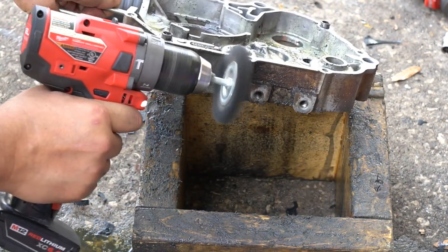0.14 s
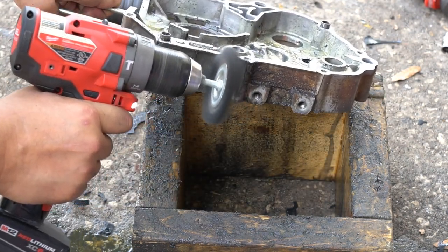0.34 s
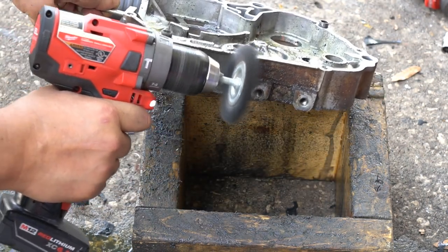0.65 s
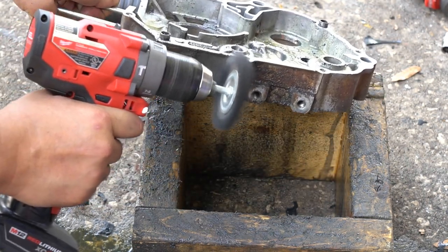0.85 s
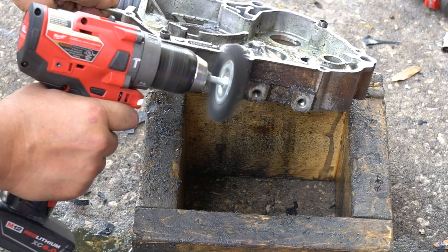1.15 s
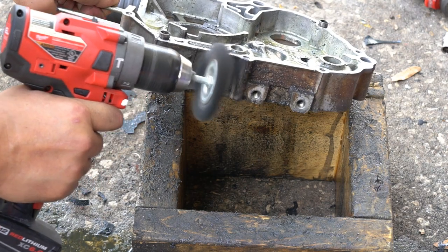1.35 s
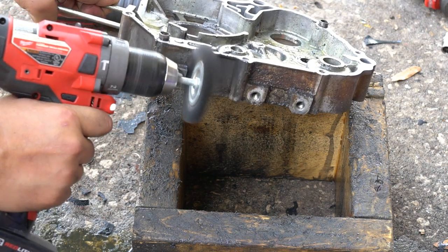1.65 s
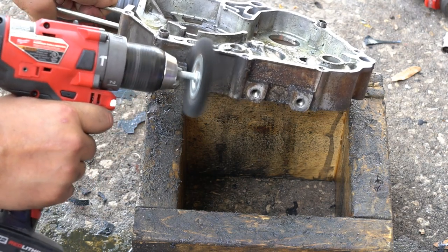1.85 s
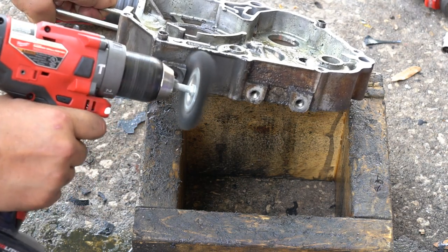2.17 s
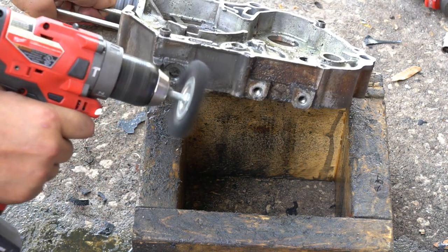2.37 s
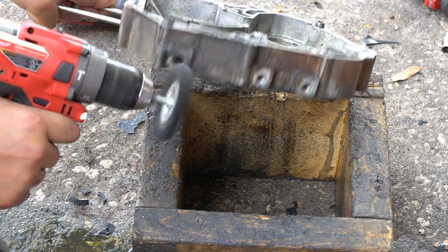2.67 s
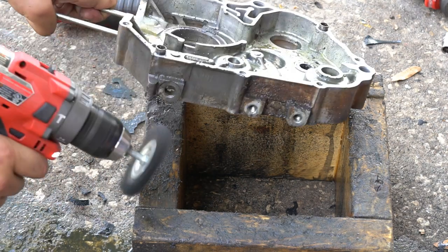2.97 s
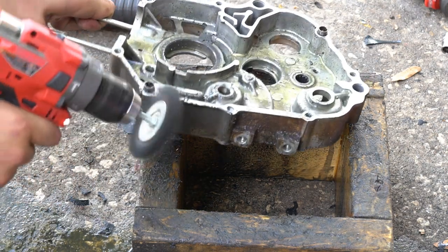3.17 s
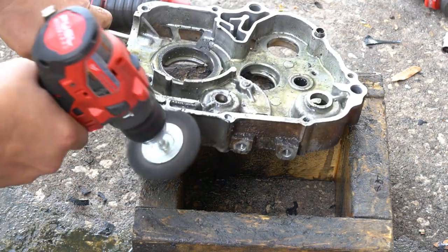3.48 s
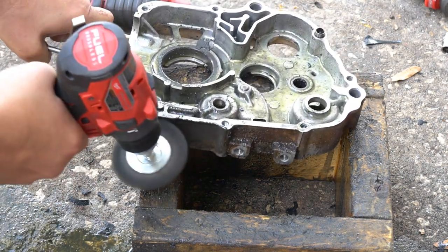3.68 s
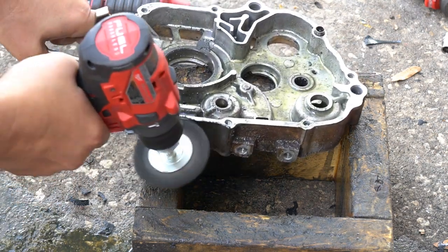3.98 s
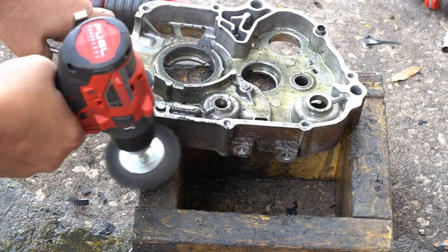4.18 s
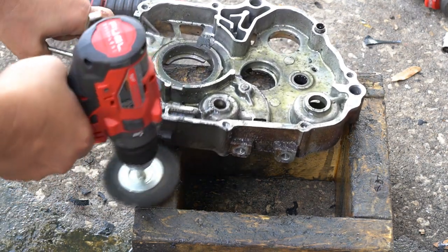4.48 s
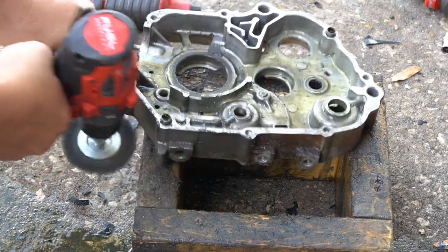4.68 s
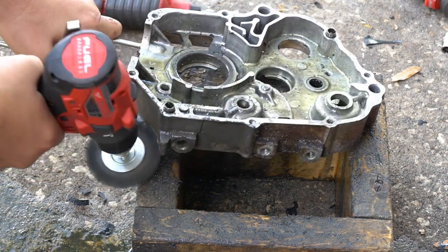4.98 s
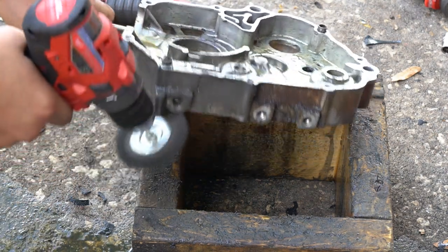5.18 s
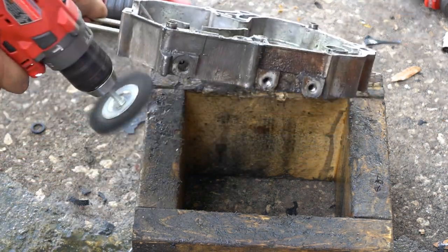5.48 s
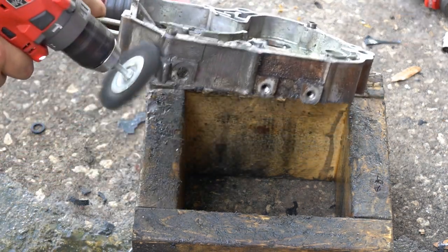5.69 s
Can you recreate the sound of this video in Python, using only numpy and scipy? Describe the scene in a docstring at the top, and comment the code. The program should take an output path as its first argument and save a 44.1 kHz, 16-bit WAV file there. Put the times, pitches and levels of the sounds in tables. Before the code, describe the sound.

A cordless drill whines loudly at high pitch while its spinning wire wheel hisses and scrapes over a cast metal case, with one hard metallic knock.

```python
"""A cordless drill spins a wire wheel against a cast metal case over a wooden box, outdoors and close by.
The motor sings on multiples of its rotor speed, over gear lines, a roar, wire hiss and a ringing case.
From 2.3 s the whine swings in level and side; from 3.4 s the drill points down and the roar turns hollow.
Soft box thumps come from 3.85 s on. At 4.63 s a hard knock rings the casting's modes, a limiter ducks and
the drill lines drop for 60 ms; lesser knocks and one gust near 5.2 s follow the hard knock."""
import sys
import numpy as np
from scipy import signal
from scipy.fft import rfft, irfft
from scipy.io import wavfile
from scipy.ndimage import uniform_filter1d, minimum_filter1d

SR = 44100
rng = np.random.default_rng(int(sys.argv[2]) if len(sys.argv) > 2 else 0)


def master(y):
    """Save y as 16-bit WAV."""
    cut = np.clip(np.atleast_2d(y).T, -1, 1)
    pcm = np.round(cut * 32767)  # scale
    wavfile.write(sys.argv[1], SR, pcm.astype(np.int16))


N = 257103

# rotor slowing as the wires bite: (time [s], speed [turns/s])
ROTOR_SPEED = [(0, 462.8), (.72, 462.6), (1.2, 465), (1.77, 464.6), (2.06, 462.3), (2.18, 463.7),
               (2.31, 469.7), (2.52, 468.2), (2.61, 471), (2.68, 464.9), (2.75, 465.5), (2.81, 461.7),
               (2.93, 469.8), (3.12, 472.1), (3.2, 471.5), (3.29, 463.5), (3.43, 466.6), (3.58, 460),
               (3.83, 457.5), (3.97, 462.8), (4.21, 457.8), (4.33, 462.3), (4.44, 459.4), (4.51, 449.3),
               (4.73, 452.5), (4.81, 467), (4.9, 472), (4.94, 470.5), (4.99, 463), (5.08, 464.5),
               (5.17, 471.6), (5.3, 467.4), (5.39, 462.2), (5.45, 465.5), (5.56, 471), (5.66, 468.4),
               (5.77, 470.4), (5.82, 465.7)]
# main whine, multiple 8, as the drill turns in the hand: (time [s], level [dB rms], left-right [dB])
WHINE = [(0, -15, 3), (.33, -14, 1.5), (.69, -15, .6), (2.19, -14, -2), (2.27, -16.5, -10),
         (2.32, -22, -2.2), (2.38, -19, -1.2), (2.63, -22.5, 8), (2.68, -14, -4), (2.75, -22, -6),
         (2.8, -15.5, -3), (2.84, -20, -2.5), (2.88, -29, 0), (2.97, -26, 16.5), (3.1, -14, 0),
         (3.21, -20, 5), (3.27, -15, -3), (3.66, -23.5, -7.5), (3.99, -22, -8.5), (4.17, -23.5, -7.5),
         (4.44, -21.5, -7), (4.52, -27, -6), (4.61, -26, 15), (4.72, -23.5, -5), (4.77, -26.5, 0),
         (4.9, -30, -19), (5.04, -26.5, 0), (5.11, -38, 3), (5.19, -30, -5), (5.22, -23, -5),
         (5.27, -19, -5), (5.39, -21, 8), (5.49, -17, -6), (5.53, -30, -7), (5.61, -20.5, 1.5),
         (5.67, -31, 8), (5.77, -16, 4), (5.82, -30, 7)]
# drop of the drill lines around the hard knock: (time [s], gain [dB])
LINE_DROP = [(4.628, 0), (4.632, -12), (4.68, -12), (4.69, 0)]
# weaker lines as the drill turns in the hand; multiple 26 and gears running free:
# (time [s], multiple 4 [dB], multiple 12 [dB], multiple 13 [dB], multiple 26 [dB], gears [dB])
OVERTONES = [(0, -27, -44, -40, -31, -39), (.7, -27.5, -41, -41.5, -31, -39),
             (2.19, -36.5, -45, -34.5, -41, -43.5), (2.5, -38.5, -40, -36, -39, -37),
             (2.85, -38.5, -48, -31, -40, -47), (3.1, -32.5, -40, -32, -36, -43),
             (3.4, -31, -46, -34.5, -32, -37.5), (3.9, -31, -46, -32.5, -34, -40),
             (4.44, -29.5, -44, -32.5, -31, -39), (4.55, -37, -46, -38, -41, -37.5),
             (4.72, -36, -48, -39, -44, -46), (4.86, -32.5, -46, -35, -41, -41),
             (5.05, -33, -39, -33, -31, -34.5), (5.17, -34.5, -46, -31, -33, -34),
             (5.27, -31, -44, -33, -38, -38), (5.45, -33, -44, -33, -41, -52),
             (5.6, -29, -36, -33, -36, -35), (5.83, -31, -42, -45, -41, -40)]
# phase by which left leads as direct sound and its reflection off the casting mix:
# (time [s], multiple 8 [rad], multiple 4 [rad])
LEFT_LEAD = [(0, 0, .55), (1, 0, .55), (1.2, .15, .55), (2.2, .2, .6), (2.3, 1.5, .1), (2.6, 1.3, .3),
             (2.72, .3, 0), (2.92, 1.9, .2), (3.07, 0, .3), (3.22, .8, .1), (3.5, .5, .3), (3.8, .2, .3),
             (4.45, 0, .25), (4.58, 1.1, .2), (4.72, -.2, -.2), (4.88, -2.2, -.1), (5, .5, -.3),
             (5.2, .7, .1), (5.5, -.1, .15), (5.62, -1.3, .15), (5.75, -.6, .2), (5.83, -1.7, .2)]
# steady motor lines: (multiple of rotor speed [1], level [dB rms])
STEADY_LINES = [(1, -44), (3, -42.5), (16, -49), (17, -49)]
# gearbox lines: (multiple of rotor speed [1], level re gears [dB], extra pointing down [dB])
GEAR_LINES = [(8.333, -1, 0), (8.281, -10, -4), (8.387, -11, -1), (8.23, -13, 0), (8.44, -15, 2),
              (6.367, -8, 0), (7.776, -14, 9), (7.52, -17, 8), (3.082, -14, -4), (11.336, -16, 6),
              (9.336, -16, 0), (10.41, -24, 13), (16.117, -18, 10)]
# drill in the hand: (time [s], pointing down [0-1], vents toward listener [dB], roar [dB])
POSE = [(0, .02, -41, -24.5), (2.2, 0.03, -39.5, -25.5), (2.75, 0.08, -36, -23.5), (2.9, 0.05, -55, -23),
        (3.25, 0.1, -55, -23.5), (3.45, 0.7, -48, -23.5), (4.4, 0.93, -37, -22), (4.72, 0.5, -55, -24.5),
        (4.95, 0.3, -48, -23), (5.83, 0, -48, -22)]
# roar spectrum: (frequency [Hz], relative density [dB/Hz])
ROAR_SPECTRUM = [(100, -44), (200, -44), (300, -30.5), (500, -22), (780, -6), (1100, -8.5), (1600, -8.5),
                 (2200, -4), (3300, -6.5), (4500, -9.5)]
# wire hiss spectrum: (frequency [Hz], relative density [dB/Hz])
HISS_SPECTRUM = [(2500, -10), (3500, -6), (4500, -9.5), (5700, -6), (6900, -10.5), (8500, -8), (11000, -14),
                 (14000, -17), (18000, -12.5)]
# left-right correlation of the noises: (frequency [Hz], likeness [1])
LIKENESS = [(100, .85), (300, .98), (600, 1), (1400, 0.92), (3000, 0.56), (6000, 0.3), (12000, 0.45)]
# balance of the noises: (frequency [Hz], left-right [dB])
NOISE_SIDE = [(60, 0.0), (180, -1), (550, 1), (1650, -1.5), (4970, 2), (15000, 0.5)]
# wheel catching an edge: (time [s], half-length [s], hiss gain [dB], ring gain [dB])
CATCHES = [(.64, 0.28, 1.5, 1.5), (2.0, 0.27, -0.3, 2), (2.472, 0.18, 3, 11), (2.65, .08, 2.5, 8),
           (2.765, 0.1, 0, 14), (3.22, 0.058, 3, 7), (4.2, 0.16, 0.5, 9), (4.444, 0.075, 4.5, .6),
           (4.96, .06, 5.5, 3), (5.23, 0.15, 2, 12.5), (5.357, 0.24, 4.5, 2), (5.8, 0.37, 5, 6)]
# modes of the casting: (frequency [Hz], knocked [dB], rubbed [dB], t60 [s])
CASTING_MODES = [(780, -30, -2, .1), (1556, -18, -3, .12), (2555, -4, 5, .1), (2850, -20, -3, .08),
                 (3316, -3, -1, .12), (3962, -10, -8, .08), (4151, -15, -10, .07), (4597, -18, -8, .07),
                 (5210, -22, -3, .04), (7350, -28, -4, .04), (7830, -26, -6, .04), (9625, -26, -1, .1)]
# knocks on the casting: (time [s], strength [dB], hardness [0-1])
KNOCKS = [(4.6295, 1.5, .1), (4.7118, -19, .7), (5.202, -13, 0)]
# casting on the box: (time [s], strength [dB])
BOX_THUMPS = [(3.849, -51), (4.58, -45), (4.721, -39), (4.779, -41), (5.129, -47), (5.195, -52)]

FREE_TURNS_PER_S, FULL_LOAD_TURNS_PER_S = 472, 14  # speed off the work; speed loss at full load
CHUCK_TURNS_PER_ROTOR_TURN = .0513
GEAR_LOAD_DB, MULTIPLE_26_LOAD_DB = 11.5, -9  # gains at full load
HOLLOW_HZ, HOLLOW_WIDTH_HZ = 1020, 300
ROAR_LAG_SAMPLES = .65  # right channel, besides the port lag
VENT_HZ, VENT_WIDTH_HZ = 8430, 200
HISS_FREE_DB, HISS_LOAD_DB, HISS_DOWN_DB = -26.5, 3.5, 1.5  # running free; gains at full load, pointing down
RING_FREE_DB, RING_LOAD_DB = -73.5, 2.5  # wire force on the casting running free; gain at full load
BREEZE_DB, BREEZE_HZ = -74.5, 140
GUST_S, GUST_LENGTH_S, GUST_DB = 5.17, .15, 13
LIMIT_DB, RELEASE_DB_PER_S, LOOK_AHEAD_S = -4, 170, .003
MIC_LOW_HZ, CUTOFF_HZ, PORT_LAG_SAMPLES = 184, 15720, .7


def from_db(db):
    """Amplitude ratio of a level in dB."""
    return 10 ** (np.asarray(db) / 20)


def rms_one(x):
    """Scale to rms 1 over all channels."""
    return x / np.sqrt(np.mean(x ** 2) + 1e-20)


def in_time(rows):
    """Columns of a table as curves, one value a sample."""
    s, *columns = np.transpose(rows)
    return [np.interp(np.arange(N) / SR, s, column) for column in columns]


def at_hz(points, hz):
    """Read a table on a log frequency axis."""
    table_hz, values = np.transpose(points)
    return np.interp(np.log(hz), np.log(table_hz), values)


def pan(x, db):
    """Left louder than right by db."""
    return x * from_db(np.array([db / 2, -db / 2]).reshape(2, -1))


def drift(rate_hz):
    """Slow random curve of rms 1: noise through two equal poles, computed every 40 samples."""
    r = np.exp(-2 * np.pi * rate_hz * 40 / SR)
    noise = rng.standard_normal(N // 40 + 2002)
    slow = signal.lfilter([1], [1, -2 * r, r * r], noise)[2000:]
    return np.interp(np.arange(N) / 40, np.arange(len(slow)), rms_one(slow))


def high_pass(x, order, hz):
    """Butterworth bass cut."""
    return signal.sosfilt(signal.butter(order, hz, "high", fs=SR, output="sos"), x)


def ring(force, hz, t60_s):
    """Damped mode: a unit click starts a decaying sine of height 1."""
    r, w = from_db(-60 / (t60_s * SR)), 2 * np.pi * hz / SR
    return signal.lfilter([0, np.sin(w)], [1, -2 * r * np.cos(w), r * r], force + 1e-18)


def resonance(x, hz, width_hz):
    """Two-pole band-pass, gain about 1 at its peak."""
    r, w = np.exp(-np.pi * width_hz / SR), 2 * np.pi * hz / SR
    peak = (1 - r * r) / 2 * np.array([1, 0, -1])
    return signal.lfilter(peak, [1, -2 * r * np.cos(w), r * r], x)


def banded(white, spectrum, patchy_db, together_db):
    """Third-octave bands, each with its level, flicker, left-right likeness and side; rms 1."""
    out, together = 0, together_db * drift(18)
    lowest, highest = spectrum[0][0], spectrum[-1][0]
    edges = np.geomspace(lowest, highest, num=round(3 * np.log2(highest / lowest)) + 1)
    for k, (low, high) in enumerate(zip(edges, edges[1:])):
        band = signal.butter(2, [low, high], "band", fs=SR, output="sos")
        mid, side = signal.sosfilt(band, white[k % 2])  # neighbours use different noise pairs
        hz = np.sqrt(low * high)
        alike = np.clip(at_hz(LIKENESS, hz), -1, 1)
        gain = from_db(at_hz(spectrum, hz) + together + patchy_db * drift(15.5))
        both = np.sqrt(1 + alike) * mid + np.sqrt(1 - alike) * side * [[1], [-1]]
        out = out + pan(gain * both, at_hz(NOISE_SIDE, hz))
    return rms_one(out)


def drill_lines(turns, load, down):
    """Motor and gear sines locked to the rotor; levels waver as the teeth and the hand shift."""
    db8, side_db = in_time(WHINE)
    db4, db12, db13, db26, gear_db = in_time(OVERTONES)
    lead8, lead4 = in_time(LEFT_LEAD)
    db26 = db26 + MULTIPLE_26_LOAD_DB * load
    gear_db = gear_db + GEAR_LOAD_DB * load

    def line(multiple, db, waver_db, side, lead=0):
        phase = 2 * np.pi * (multiple * turns + rng.random())
        wave = np.sqrt(2) * np.sin([phase + lead, phase])
        return pan(wave * from_db(db + waver_db * drift(25)), side + 0 * turns)

    # the wheel runs slightly out of true
    wobble_db = .5 * np.sin(2 * np.pi * CHUCK_TURNS_PER_ROTOR_TURN * turns)
    out = line(8, db8 + wobble_db, .64, side_db, lead8)
    out += line(4, db4, 2.1, -2.5, lead4)
    out += line(12, db12, 2.4, .3)
    out += line(13, db13, 2.3, 5.3)
    out += line(26, db26, 1.6, 1.2)
    for multiple, db in STEADY_LINES:
        out += line(multiple, db, .8 + .16 * multiple, .3)
    for multiple, db, down_db in GEAR_LINES:
        out += line(multiple, gear_db + db + down_db * down, 2.2, .44 * side_db)
    return from_db(in_time(LINE_DROP)[0]) * out


def roar(level_db, down):
    """Broad noise of gears, fan and bearings, notched near one pitch while the drill points down."""
    noise = banded(rng.standard_normal((2, 2, N)), ROAR_SPECTRUM, patchy_db=.96, together_db=.67)
    noise[1] = signal.lfilter([1 - ROAR_LAG_SAMPLES, ROAR_LAG_SAMPLES], [1], noise[1])
    hollow = noise - .92 * down * resonance(noise, HOLLOW_HZ, HOLLOW_WIDTH_HZ)
    return from_db(level_db) * hollow


def vent_whistle(level_db):
    """Air vents whistle: noise through a narrow resonance, largely common to both channels."""
    air = rng.standard_normal((3, N))
    whistle = resonance(air[0] + .35 * air[1:], VENT_HZ, VENT_WIDTH_HZ)
    return from_db(level_db) * rms_one(whistle)


def wire_ticks(turns, per_s, shape):
    """Random wire-tip clicks of uneven size, pressing harder once a turn of the wheel; rms 1."""
    sizes = from_db(1.9 * np.minimum(rng.exponential(1, shape), 5)) * rng.choice([-1, 1], shape)
    press = from_db(.81 * np.sin(2 * np.pi * CHUCK_TURNS_PER_ROTOR_TURN * turns))
    return rms_one(sizes * (rng.random(shape) < per_s / SR) * press)


def wire_hiss(turns, level_db):
    """Dense wire ticks shaped into a flickering band spectrum."""
    ticks = wire_ticks(turns, 16000, (2, 2, N))
    return from_db(level_db) * banded(ticks, HISS_SPECTRUM, patchy_db=.93, together_db=.87)


def catches():
    """Wheel catches as triangular swells: hiss and ring gains in dB."""
    s, half_length_s, hiss_db, ring_db = np.transpose(CATCHES)
    t = np.arange(N)[:, None] / SR
    swell = np.maximum(1 - np.abs(t - s) / half_length_s, 0)
    return swell @ hiss_db, swell @ ring_db


def casting(turns, ring_db):
    """Wire tips keep the modes ringing softly, spot by spot; knocks strike the same modes."""
    ticks = from_db(ring_db) * wire_ticks(turns, 6000, (2, N))
    ticks = np.array([ticks[0] + .31 * ticks[1], ticks[0] - .29 * ticks[1]])
    out = 0
    for hz, knock_db, rub_db, t60_s in CASTING_MODES:
        blows = np.zeros(N)
        for s, db, hardness in KNOCKS:
            tilt_db = 13 * hardness * np.log2(hz / 3300)  # a harder blow is brighter
            blows[round(s * SR)] = from_db(knock_db + db + tilt_db)
        rub = ticks * from_db(rub_db + 4 * drift(3))
        out = out + ring(rub + blows, hz, t60_s)
    return high_pass(out, 3, 600)  # too small to radiate bass


def box_thumps():
    """Soft blows on the wooden box: two short dull modes."""
    blows = np.zeros(N)
    for s, db in BOX_THUMPS:
        blows[round(s * SR)] = from_db(db)
    return high_pass(ring(blows, 242, .039) + ring(blows, 350, .054), 2, 150)


def breeze():
    """Faint lumpy air on the microphone ports: low-passed noise with one gust."""
    air = rng.standard_normal((3, N))
    low_pass = signal.butter(4, BREEZE_HZ, fs=SR, output="sos")
    low = signal.sosfilt(low_pass, air[0] + .4 * air[1:])
    gust_db = GUST_DB * np.exp(-((np.arange(N) / SR - GUST_S) / GUST_LENGTH_S) ** 2)
    return from_db(BREEZE_DB + gust_db + 4.7 * drift(3)) * rms_one(low)


def scene():
    """Rotor speed sets pitch and load; load and pose set the levels of the layers."""
    speed, = in_time(ROTOR_SPEED)
    load = np.clip((FREE_TURNS_PER_S - speed) / FULL_LOAD_TURNS_PER_S, 0, 1)
    down, vent_db, roar_db = in_time(POSE)
    down = np.clip(down, 0, 1)
    hiss_db, ring_db = catches()
    hiss_db = hiss_db + HISS_FREE_DB + HISS_LOAD_DB * load + HISS_DOWN_DB * down
    ring_db = ring_db + RING_FREE_DB + RING_LOAD_DB * load
    shudder = .55 * drift(25)  # turns/s, uneven bite of the wires
    turns = np.cumsum(speed + shudder) / SR
    drill = drill_lines(turns, load, down) + roar(roar_db, down) + vent_whistle(vent_db)
    work = wire_hiss(turns, hiss_db) + casting(turns, ring_db) + box_thumps()
    return drill + work + breeze()


def record(dry):
    """A look-ahead limiter ducks on peaks; the right port hears slightly late; bass and top are cut."""
    release_db = RELEASE_DB_PER_S * np.arange(N) / SR
    peak_db = 20 * np.log10(np.abs(dry).max(axis=0) + 1e-9)
    over_db = np.maximum(peak_db - LIMIT_DB, 0)
    held_db = np.maximum.accumulate(over_db + release_db) - release_db
    ahead = round(LOOK_AHEAD_S * SR)
    widest_db = -minimum_filter1d(-held_db, size=2 * ahead + 1)  # running maximum
    early_db = uniform_filter1d(widest_db, size=ahead)
    wet = high_pass(dry * from_db(-early_db), 2, MIC_LOW_HZ)
    delay = np.exp(-1j * np.pi * np.arange(N + 1) / N * PORT_LAG_SAMPLES)  # fractional, as a phase slope
    wet[1] = irfft(rfft(wet[1], 2 * N) * delay)[:N]
    top_cut = signal.ellip(12, .5, 70, CUTOFF_HZ, fs=SR, output="sos")
    return signal.sosfilt(top_cut, wet)


dry = scene()
out = record(dry)
master(out)
```